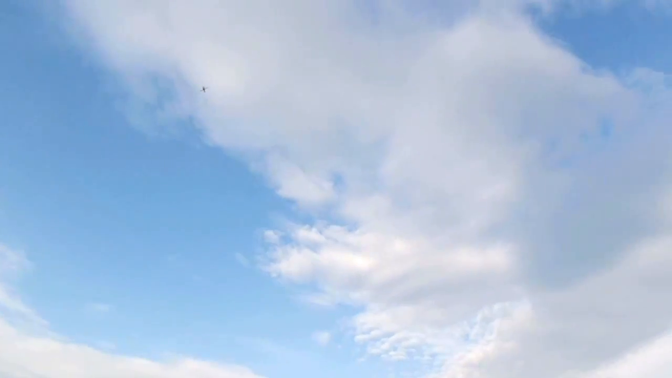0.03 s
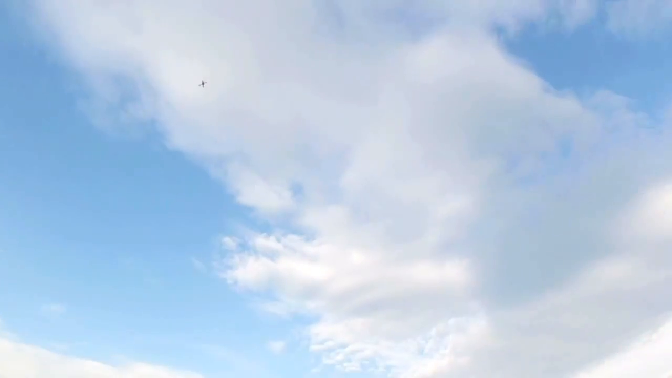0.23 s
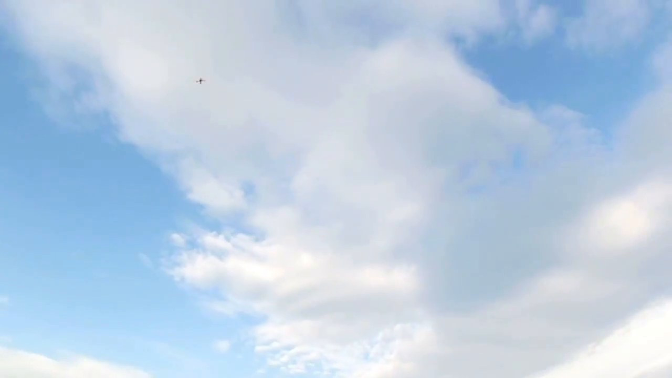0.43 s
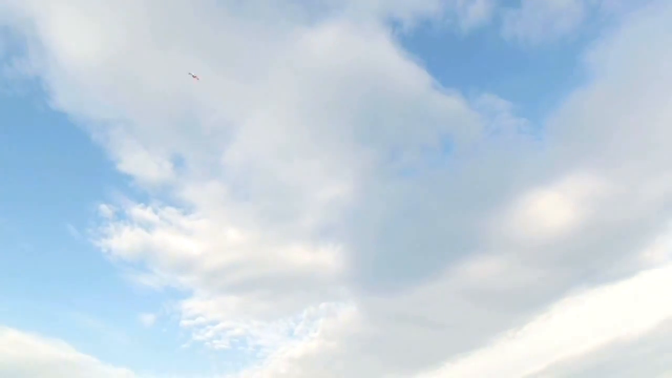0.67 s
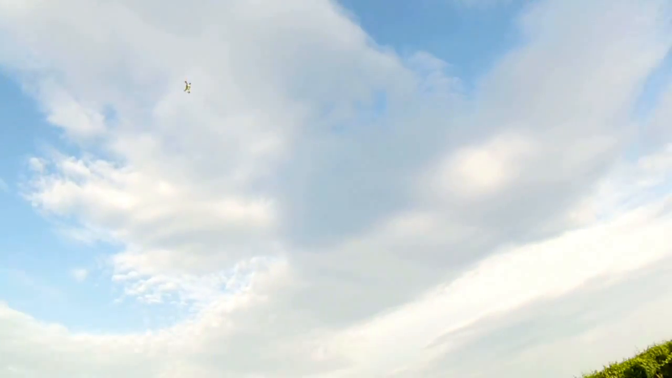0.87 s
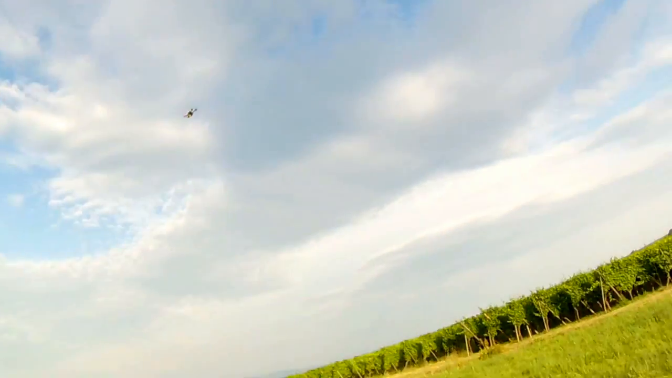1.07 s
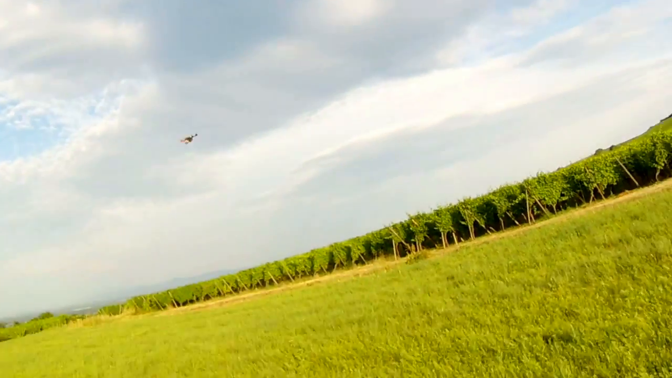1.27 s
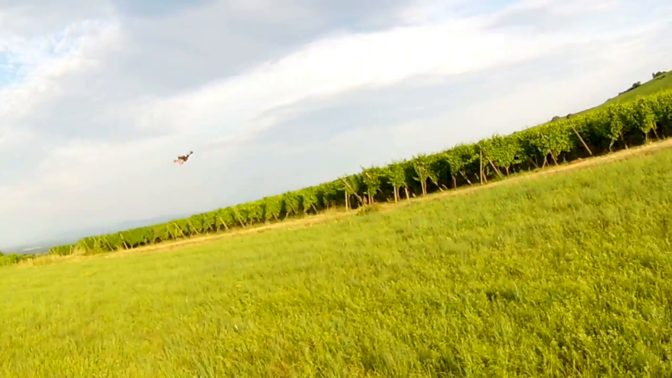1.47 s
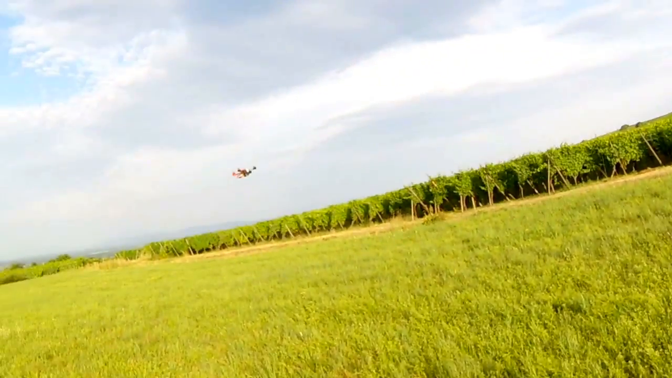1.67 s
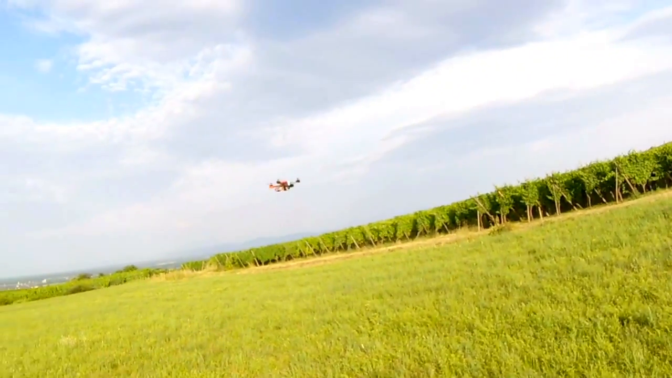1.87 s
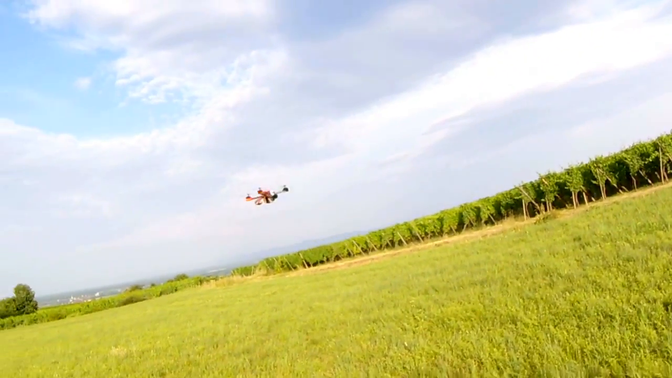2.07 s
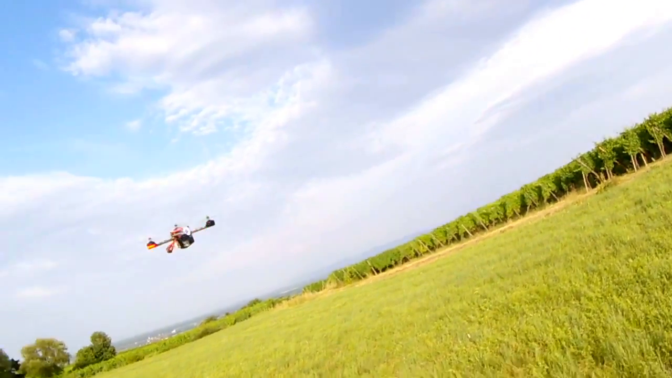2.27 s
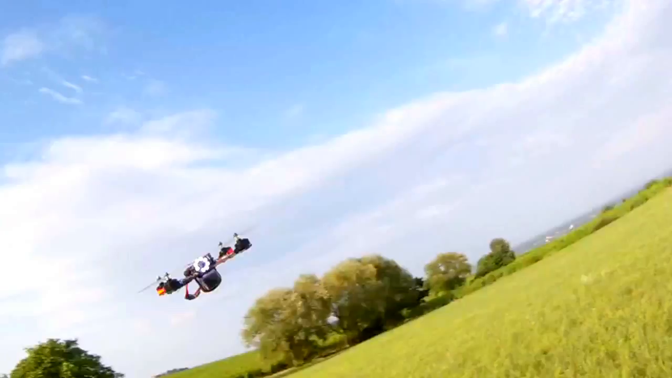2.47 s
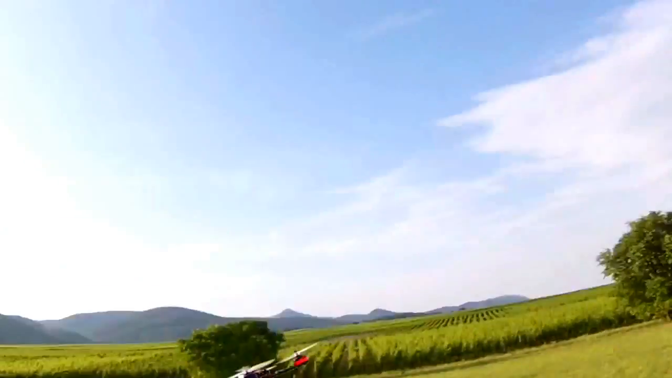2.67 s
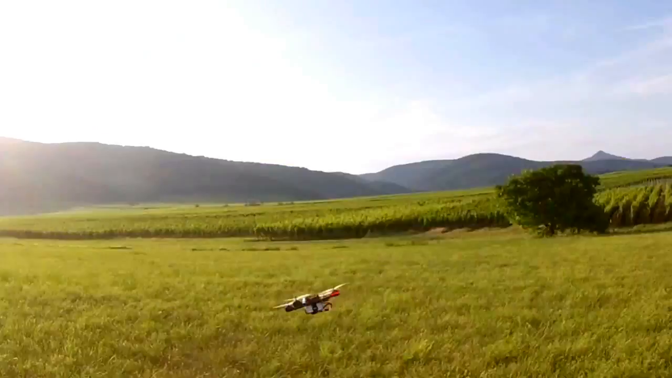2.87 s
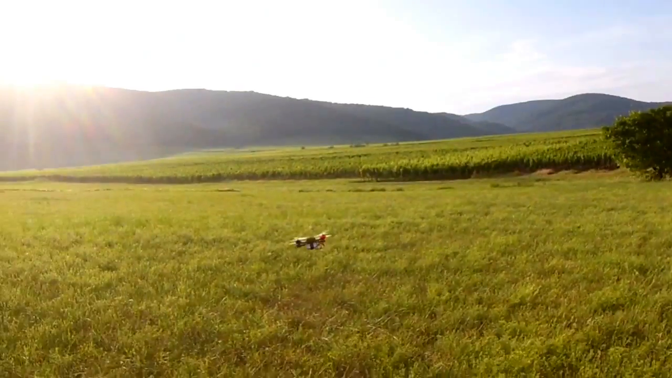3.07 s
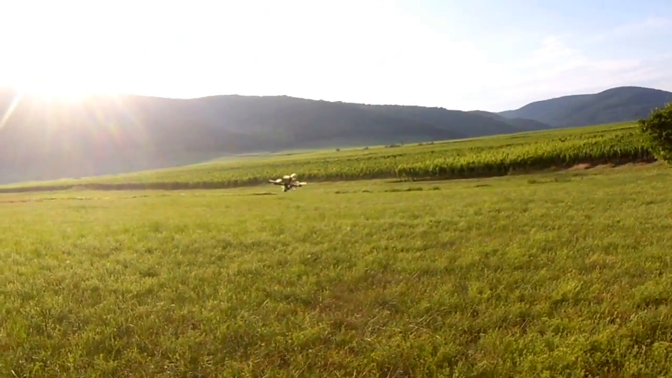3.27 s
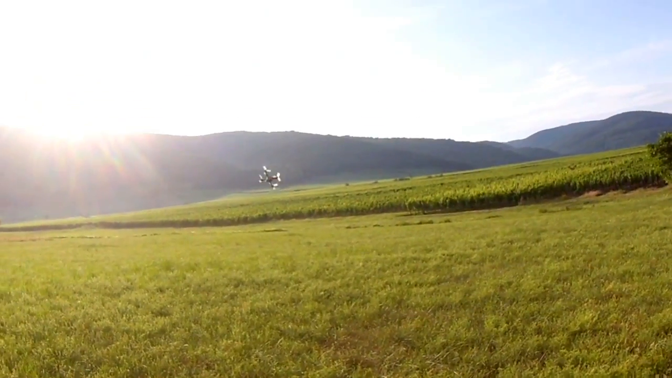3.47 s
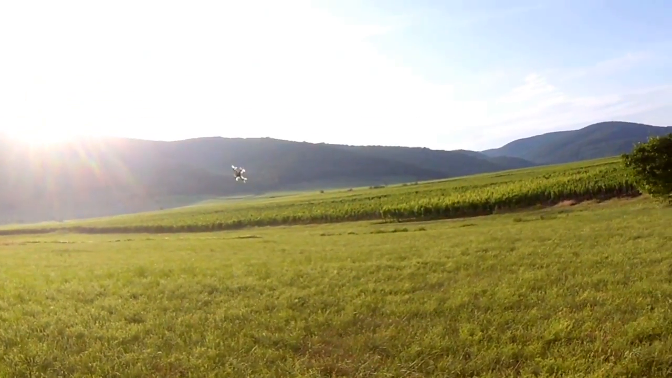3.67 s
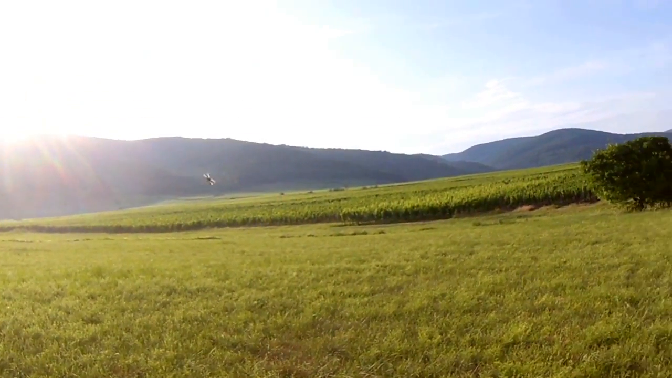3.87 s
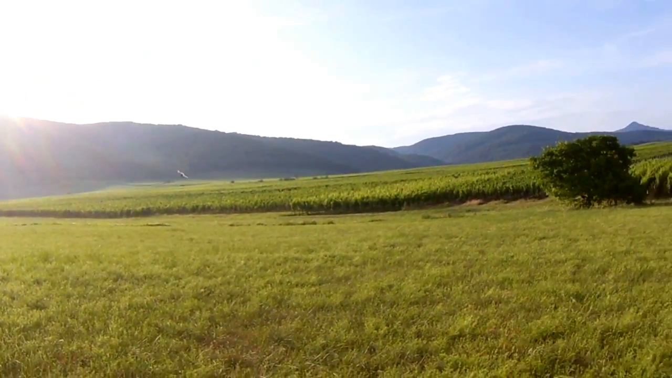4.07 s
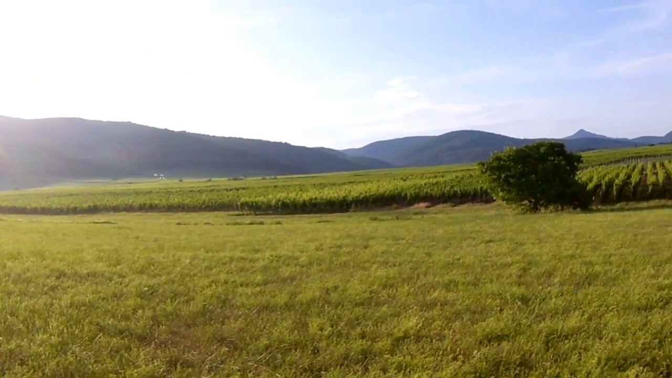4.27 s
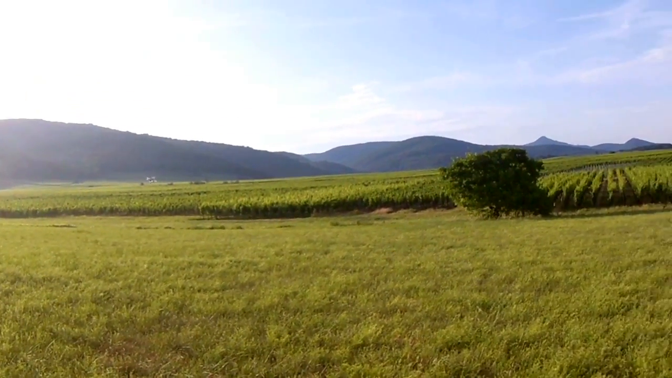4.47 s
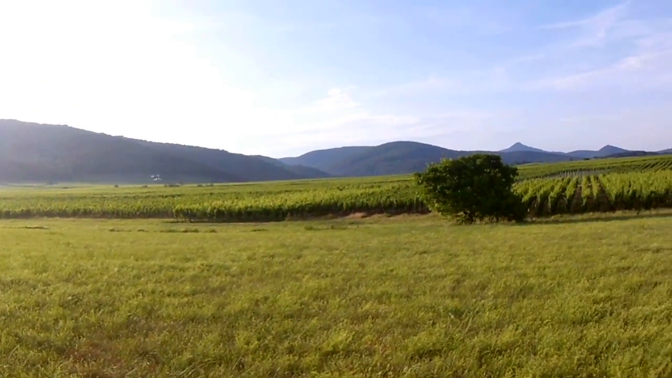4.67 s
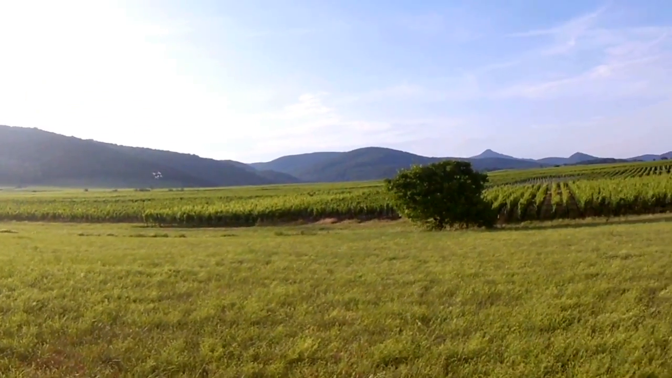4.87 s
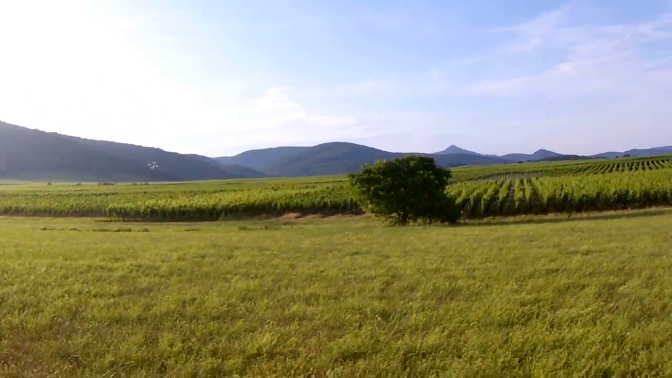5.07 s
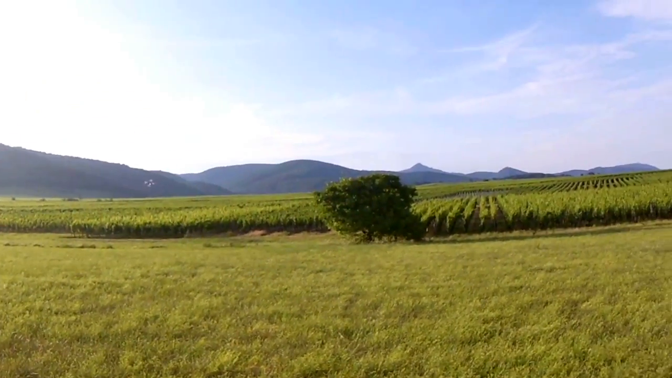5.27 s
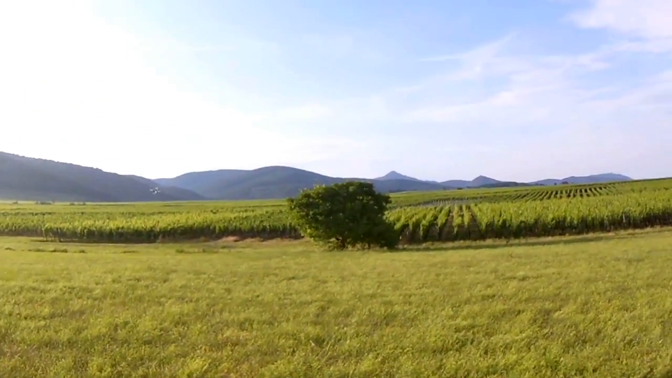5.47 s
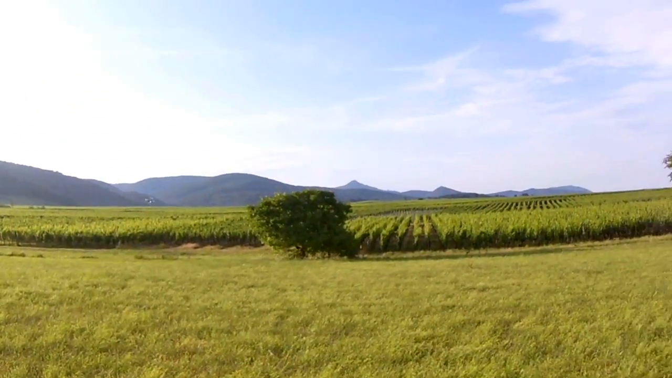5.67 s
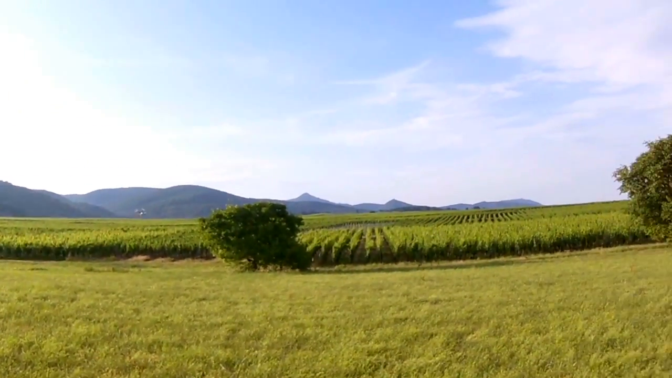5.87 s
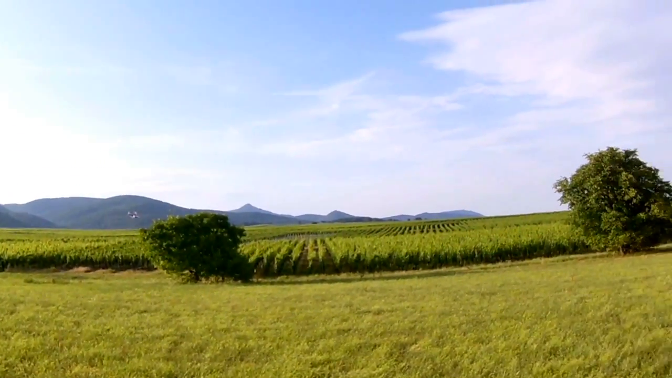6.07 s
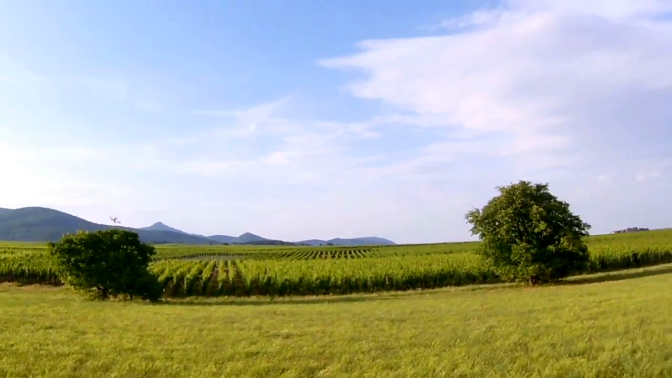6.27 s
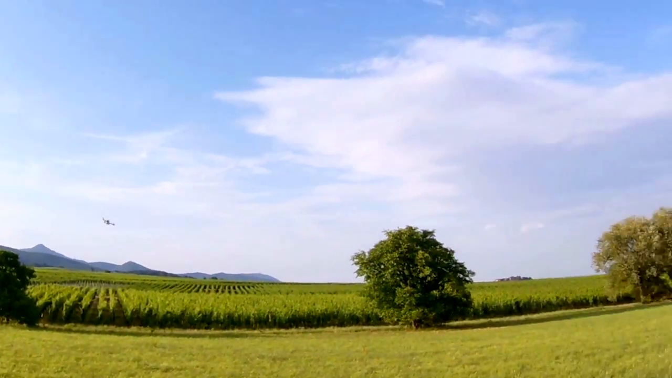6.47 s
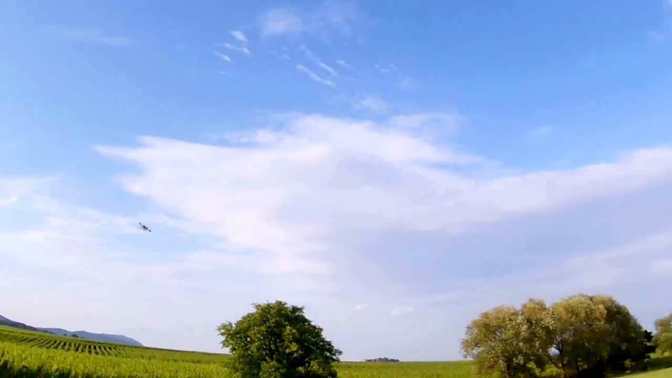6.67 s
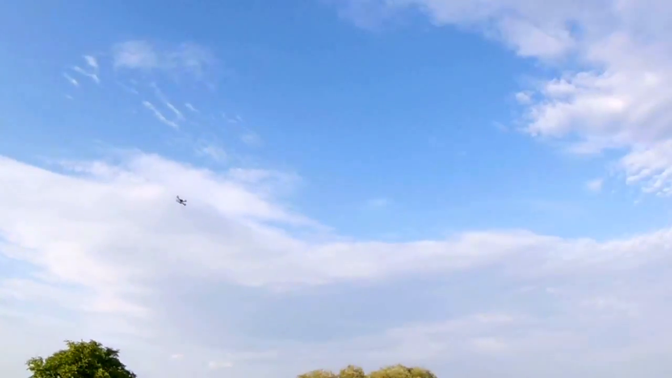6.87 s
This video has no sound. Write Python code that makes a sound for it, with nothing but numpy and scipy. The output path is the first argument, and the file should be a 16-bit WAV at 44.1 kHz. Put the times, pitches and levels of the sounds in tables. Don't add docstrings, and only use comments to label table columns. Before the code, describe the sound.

For the first second there is only a low, steady rush of air, slight electronic hiss and a very faint distant drone. From about 1.0 s a small quadcopter's rotors spool up fast, peaking around 1.3 to 1.6 s as a loud, raspy whine roughly doubled in pitch, with hissing chopped air. By 1.8 s it drops to a quieter, lower hum of several slightly detuned tones, with tiny snaps, growing steadily. Around 2.7 to 3.2 s a second rev and close pass swell, with a soft wind thump, then the pitch falls and a thin motor whine trails off by 3.5 s. It stays distant until a rough, fluttering surge at 4.4 to 5.3 s. A quieter buzz follows with low wind bumps near 5.7 to 6.3 s, then pitch climbs and level rises toward the end at about 7 s. The sound is dry, outdoor and slightly boxy.

```python
import sys
import numpy as np
from scipy import signal
from scipy.fft import rfft, irfft, next_fast_len
from scipy.io import wavfile
from scipy.ndimage import uniform_filter1d, map_coordinates

SR = 44100
rng = np.random.default_rng(int(sys.argv[2]) if len(sys.argv) > 2 else 0)


def volts_from_db(level):
    exponent = np.asarray(level, float) / 20
    return 10 ** exponent


def generate_wav(sig):
    pcm = np.round(np.clip(np.atleast_2d(sig).T, -1, 1) * 32767).astype(np.int16)
    wavfile.write(sys.argv[1], SR, pcm)


N = 304995
TIME_S = np.arange(N) / SR
CRUISE_HZ = 600
SLOW_SHAFT_DB = -28
MIDDLE_M = 15

# [start_s, turbulence_0_to_1]
TURBULENCE = [(0, .6), (1, .35), (1.3, .3), (1.55, .3), (1.7, .15), (2, .1), (2.9, .16), (3.03, .22),
              (3.1, .08), (3.3, .1), (3.45, .15), (3.7, .1), (3.9, .17), (4.2, .32), (4.9, .24), (5.2, .16),
              (5.75, .2), (5.85, .1), (6.5, .11), (6.92, .13)]
# [start_s, level_db]
STRENGTH = [(0, -70.5), (.98, -68.5), (1.25, -53), (1.33, -44.5), (1.54, -42), (1.63, -50.5), (1.77, -58.5),
            (2.69, -44.5), (3.1, -46), (3.51, -58.5), (4.18, -61.5), (4.49, -51), (4.8, -49.5),
            (4.9, -53.5), (5.32, -55), (5.51, -63.5), (6.34, -63), (6.9, -51)]
# [start_s, distance_m]
DISTANCE = [(0, 25), (1.4, 6.7), (2.2, 4), (3.05, 8.05), (3.33, 11), (3.5, 23), (4.7, 21), (5.25, 20),
            (5.8, 6.3), (6.4, 24.8), (6.92, 43)]

# [start_s, pitch_hz]
FAST_CRUISE = [(0, 620.6), (1, 649), (1.76, 501.6), (1.9, 499), (1.97, 572.5), (2.3, 572.8), (2.6, 551.5),
               (2.9, 551), (3.55, 588), (4.1, 543.3), (4.5, 650.3), (4.72, 649.7), (4.95, 505),
               (5.07, 488.2), (5.13, 587.7), (5.72, 622.4), (6.2, 720.4), (6.92, 760.7)]
# [start_s, spool_up_s, hold_s, spool_down_s,
# extra_hz]
FAST_PUNCHES = [(1.11, 0.32, .13, 0.18, 600), (1.385, .02, .01, .015, 60), (1.415, .015, .03, 0.03, -170),
                (1.6, .04, .03, .05, -50), (2.94, .04, .08, .05, -35), (3.27, .03, .02, .04, 30),
                (3.43, .03, .01, .03, 80), (4.82, .03, .04, .08, 25), (5.96, .05, .03, .12, 20),
                (6.02, .1, .1, .12, 27), (6.86, .04, .2, .1, 15), (3.52, .05, .25, 0.081, -30),
                (6.43, .04, 0.0099, .03, -25), (6.49, .03, .01, .05, 30), (2.89, .28, 0.061, .22, 415),
                (3.35, 0.02003, 0.01978, 0.0298, 71), (4.72, 0.056, .01, 0.065, 99.5),
                (5.73, .11, .09, 0.087, 135), (5.74, 0.098, .16, 0.18, 72), (6.27, .3, 0.59, .2, 335)]
# [start_s, blade_db, overtones_db]
FAST_AIM = [(0, -27, -19), (1.05, 0.5, 1), (1.42, -17, -10), (1.53, -13, -8), (1.68, 5.5, -8),
            (2.1, -4.5, -26), (2.3, 0.5, 2.5), (2.88, -1, -6.5), (2.95, -1, -5), (3.05, -2.5, 5.5),
            (3.11, 0.5, -12), (3.33, 0, 0.5), (3.5, 1, -9), (3.75, -8.5, -9), (4.3, -10.5, -4.5),
            (4.85, -2, -1), (5.9, -5, -3), (6.92, 0.5, -0.5)]
# [crest_s, beat_hz, depth_db, lasts_s,
# pitch_swing_hz]
BEATS_AND_HUNTING = [
    (1.534, 8.2, 4, 0.14, 13.5),
    (3.178, 10.6, 0.5, .14, 27.5),
    (4.502, 5.5, -0.5, .16, 29.5),
    (6.71, 8.8, 4, 0.23, -2.5),
                     (3.7, 11.5, 1.5, .25, 42),
]
# [middle_s, blade_db, overtones_db, lasts_s]
FAST_SWELLS = [(1.34, 0, 5, .04), (1.428, 0, -9, .012), (2.965, 0, 5, .02), (6.16, -10, 0, .07),
               (1.445, -8, 0, .005), (3.47, 5, 0, .03), (3.61, 0, 5, .04), (3.79, 0, 4, .04),
               (4.74, -6, 0, .04), (6.38, 0, 9, .05), (2.5, -9, 0.5, 0.027), (2.59, -4, 3.5, .03),
               (2.74, -9, -2, 0.024), (2.83, 4.5, -3, 0.06), (2.4, 2.5, -0.5, .06), (4.841, 0, 4.5, .025),
               (5.123, 0.5, 5, .025), (5.175, -3, -10, .02), (6.519, 4, 2, .02), (6.359, -3, 0, .015),
               (1.406, 5.5, -0.5, 0.014), (3.698, -1, 7, 0.14), (4.755, 4, 1.5, 0.045),
               (6.46, -4, -4, 0.026), (1.69, -8.5, -4, 0.036), (2.952, 3, 5.5, 0.023), (3.101, 0, -8, .02),
               (3.346, -0.5, -5, .02), (5.24, -2, 7.5, 0.044), (6.91, -7, -5, .015), (1.271, 8, 1, .008),
               (1.305, 6, 2, .015), (1.437, 9.5, -4, 0.011), (1.461, 9.5, 0.5, 0.0096),
               (3.411, 2.5, -7, .05), (4.798, -4.5, -0.5, 0.045), (6.576, -2.5, -10, 0.028),
               (6.809, 0.5, -5.5, 0.021), (1.285, -31, -7.5, 0.094), (2.987, -16.5, 1.5, 0.048),
               (3.189, 5, 0, 0.064), (3.36, -12, -5, 0.033), (4.874, 5, 3.5, 0.077),
               (5.042, -0.5, -2.5, 0.054), (5.351, -21, -5.5, 0.14), (6.31, 7.5, -15, 0.034),
               (6.428, -6, -18, 0.063)]
# [middle_s, third_db, fourth_db, shaft_db, lasts_s]
FAST_BALANCE = [(1.47, 0, -0.5, -6, 0.048), (2.15, 0.5, 0.5, 7, 0.23), (2.5, -9, 0.5, 1, 0.051),
                (2.63, 4, -1, 1, .07), (2.85, -2, 3, -9, .07), (3, -12, -1, -1, .09), (3.2, -7.5, 3, 0, .1),
                (3.04, -2, 5, 0, .05), (3.72, 0, 3, 0, .2), (4.5, 0, 5, 0, .15), (4.76, 0, -12, 0, .05),
                (4.7, 1, 1, -5, .15), (6.1, -6, -3, 1, .2), (6.75, 0, 0, -5.5, .04)]

# [start_s, pitch_hz]
SLOW_CRUISE = [(0, 479), (.9, 523.6), (1, 407), (1.2, 558.1), (1.78, 471), (1.9, 437.3), (1.96, 490),
               (2.9, 498.5), (3.5, 548), (4.2, 479.1), (4.6, 595.5), (4.85, 447), (5.05, 486.4), (5.3, 490),
               (5.4, 518), (5.72, 603.6), (6.1, 687), (6.92, 788.6)]
# [start_s, spool_up_s, hold_s, spool_down_s,
# extra_hz]
SLOW_PUNCHES = [(6.52, .03, .1, .08, -15), (6.75, .08, .3, .1, 20), (1.47, .04, .07, 0.0499, -60),
                (4.18, .01, .02, .06, -20), (5.13, .04, .01, .03, 25), (1.17, .22, .19, .14, 485),
                (2.97, 0.18, .08, .16, 260), (5.17, 0.054, 0.01, 0.0506, -45.5), (5.72, .11, .07, .17, 195),
                (6.36, 0.21, 0.61, .2, 163.5)]
# [start_s, blade_db, overtones_db]
SLOW_AIM = [(0, -17, -22), (.8, -3, -5), (.97, 21, 5), (1.15, 2, -9.5), (1.3, -5, 0), (1.6, -10, -7.5),
            (1.75, 8.5, -10.5), (2.3, 4, -7), (2.75, -4, -4.5), (3.05, -8, -27), (3.25, -9.5, -5),
            (3.5, -5, -15), (4.45, -2, -1), (4.85, -8.5, -20.5), (5.33, 2, 4), (5.48, -8.5, -11.5),
            (6.62, -0.5, -14.5), (6.92, -5.5, -2)]
# [middle_s, blade_db, overtones_db, shaft_db, lasts_s]
SLOW_SWELLS = [(1.21, -3, -8, 0, .03), (1.41, -10, -8, 0.5, .02), (1.432, 4, -5, 0, .008),
               (1.445, -8, -5, 0, .005), (1.457, 4, 0, -0.5, .008), (1.68, -5, 0, 0, .03),
               (1.49, -8, -3, 0, 0.018), (2.24, 2.5, 1, 0, 0.043), (2.37, 6, -1, 0, 0.061),
               (2.47, -10, 0, 0, .02), (2.55, 1.5, 2.5, 0, .05), (2.63, -8, -1, 0, .03),
               (2.87, -4, -4, 0, 0.051), (3.7, -3, -10, 0, .15), (4.25, 0, 5.5, 0, 0.039),
               (4.43, 3, -1, 0, 0.027), (4.99, -1, -4, 0, .03), (5.07, 0, 8, 0, .02),
               (5.13, -2, -8, 0, .03), (5.2, 5, 6, 0, .02), (6.5, 0, 7, 0, .07), (6.65, 0, 0, 6.5, .12)]
# [start_s, spool_up_s, hold_s, spool_down_s, extra_hz]
LAGGING_PUNCH = [
    (1.12, .38, .06, 0.11, 344.4),
]

# [start_s, pitch_hz, blade_db, overtones_db]
CORRECTIONS = [
    [(1.01, 360.2, 10, -4), (1.12, 399.5, 9, 7), (1.17, 440, 4, 0), (1.21, 456, 3, -4)],
    [(1.24, 700, -19, -9), (1.33, 820.7, -22, -3), (1.43, 1000, -15.5, -2), (1.5, 1290, -25, -3),
     (1.56, 1130, -21, -10), (1.64, 800, -14, -12)],
    [(3.08, 600, -12, -2), (3.2, 650.2, -26, -16), (3.32, 622.7, -9, -4.5), (3.42, 603, -4, -6),
     (3.48, 515, -4, -6), (3.6, 495.2, -8, -10), (3.75, 518, -15, -17), (4.1, 497.5, -4, -17)],
    [(4.28, 554.9, 3, 3), (4.5, 563.2, -5.5, -7), (4.6, 572.3, -11, 1.5), (4.66, 601.8, -11, 1),
     (4.76, 637, -17, -5), (4.84, 597, -3, 0), (4.9, 572.6, -3, -0.5), (5, 590.7, -11.5, -12),
     (5.08, 597.6, -11, -10)],
    [(5.17, 490, 4, -2), (5.24, 505, 0, 2), (5.3, 535, 3, 6), (5.38, 570, -8, 7), (5.43, 570, -4, -10)],
    [(6.11, 615, -15, -4), (6.31, 625, -12, 0), (6.37, 590, -12, -12), (6.47, 640, -6, -8),
     (6.53, 695, -14, -6), (6.75, 708.5, -10.5, -9), (6.86, 722, -20, 4.5), (6.96, 733, -17, -3)],
]
# [third_db, fourth_db]
CORRECTING_UPPER = [(4, -6), (-2, -4), (0, 9), (4, -3), (10, -6), (-6, -14)]

# [shaft_multiple, level_db relative to the shaft tone]
UNEQUAL_BLADES = [(2, -3), (4, -5.5), (5, -14)]
# [pitch_hz, level_db]
HOUSING = [(190, -9.5), (330, 0.5), (600, -1.5), (680, -7), (735, 0.5), (1300, 4), (1450, 1.5),
           (1900, -6.5), (2550, -1), (3000, -9.5), (4100, -8), (4400, -19.5), (5050, -10), (5800, -42.5)]
# [start_s, pitch_hz, level_db]
WHINE = [(3.09, 3500, -95), (3.14, 3800, -80), (3.22, 4150, -76), (3.3, 4100, -77), (3.38, 3960, -75),
         (3.42, 3900, -100)]

# [pitch_hz, level_db per Hz]
CHOP = [(88, -47.5), (150, -32.5), (436, -10.5), (478, -8.5), (553, -8), (810, -6), (1130, 2.5),
        (1270, 1.5), (2240, -9), (3500, -43), (4550, -74), (7700, -120)]
# [pitch_hz, level_db per Hz]
EDGE = [(1900, -22), (2500, -0.5), (2750, -4.5), (2950, -10), (3500, -14.5), (3800, -13), (4150, -13.5),
        (4500, -17.5), (5020, -17.5), (5250, -29.5), (5700, -35), (7000, -30.5), (9500, -40), (12000, -65)]
# [start_s, peak_db, pitch_hz, crack_db]
SNAPS = [(1.856, -38, 940, -45), (2.156, -35, 1170, -39), (2.477, -39, 1117, -14),
         (2.697, -37.5, 1649, -42), (2.9358, -26.5, 1165, -45.5), (4.642, -34, 1280, -31)]
# [start_s, peak_db, pitch_hz]
KNOCKS = [(6.1, -50, 301), (6.179, -47.5, 321.5), (6.3, -48.5, 256)]
# [pitch_hz, level_db per Hz]
HOUSING_RING = [(4400, -60), (4720, -4), (4850, -13.5), (5030, -1.5), (5250, -60)]
# [middle_s, level_db, lasts_s]
RINGS = [(4.58, -81, 0.35), (5.899, -86, .2), (6.7, -88.5, .3)]
# [middle_s, rise_db, lasts_s]
GUSTS = [(2.75, 16, 0.13), (5.75, 12, .45), (6.2, 16.6, 0.15)]
# [pitch_hz, level_db per Hz]
THUMP = [(15, -54), (40, -9.5), (80, -3.5), (150, 4), (250, -4.5), (450, -42)]
# [pitch_hz, level_db per Hz]
AIR = [(15, -68), (25, -41.5), (134, -13.5), (222, -5.5), (331, -2.5), (569, -4), (642, -2), (724, -7.5),
       (3000, -31), (3900, -60), (6600, -120)]
# [pitch_hz, level_db per Hz]
PREAMP = [(1760, -25.5), (3000, 0), (4180, -5), (5620, -3), (10100, -7.5), (14600, -9), (15600, -11)]
# pitch_hz, width_hz, depth_0_to_1
CAVITY = (707.4, 39, 0.85)


def unit(x):
    return x / np.sqrt(np.mean(x ** 2) + 1e-20)


def curves(rows):
    s, *columns = np.transpose(rows)
    return [np.interp(TIME_S, s, column) for column in columns]


def wobble(rate):
    points = rng.standard_normal(int(N * rate / SR) + 4)
    return unit(map_coordinates(points, [np.arange(N) * rate / SR]))


def filtered(x, response):
    m = next_fast_len(N + 8192)
    return irfft(rfft(x, m) * response(np.fft.rfftfreq(m, 1 / SR)), m)[..., :N]


def coloured(x, spectrum):
    f, db = np.transpose(spectrum)
    return unit(filtered(x, lambda hz: volts_from_db(np.interp(np.log(hz + 1), np.log(f + 1), db))))


def noise(spectrum):
    return coloured(rng.standard_normal(N), spectrum)


def bell(s, lasts):
    return np.exp(-((TIME_S - s) / lasts) ** 2)


def swells(rows):
    return sum(np.outer(db, bell(s, lasts)) for s, *db, lasts in rows)


def ease(s, length):
    return np.sin(np.pi / 2 * np.clip((TIME_S - s) / length, 0, 1)) ** 2


def spooled(punches):
    return sum(hz * (ease(s, up) - ease(s + up + hold, down)) for s, up, hold, down, hz in punches)


def rotor(hz, levels, turbulence):
    hunting = 0.06 * wobble(20) + 0.03 * wobble(120)
    shaft_hz = uniform_filter1d(hz, size=900) / 3 * (1 + turbulence * hunting)
    turn = 2 * np.pi * np.cumsum(shaft_hz) / SR
    sound = np.zeros(N)
    for k, db in levels:
        shaken = np.minimum(0.85 * turbulence * (k / 3) ** 0.7, 0.85)
        load = ((1 - shaken) + shaken * wobble(90)) / np.hypot(1 - shaken, shaken)
        strength = np.sqrt(2) * volts_from_db(db + 1.29 * wobble(15)) * load
        sound += strength * np.sin(k * turn + rng.uniform(0, 7.03))
    return sound, 3 * turn


def twins(hz, blade_db, second_db, third_db, shaft_db, turbulence, fourth_db=0):
    passed = lambda k: np.interp(k * hz / 3, *np.transpose(HOUSING))
    levels = [(1, shaft_db), (3, blade_db), (6, second_db), (9, third_db)]
    levels += [(k, shaft_db - passed(1) + passed(k) + db) for k, db in UNEQUAL_BLADES]
    fourth_db = fourth_db - 12.5 - 12 * np.log2(hz / CRUISE_HZ)
    levels.append((12, second_db + passed(12) + fourth_db))
    levels.append((14, second_db + passed(14) - 22.5))
    first, passes = rotor(hz, levels, turbulence)
    second, _ = rotor(hz * (1 + 0.16 * turbulence * wobble(7)), levels[1:4], turbulence)
    share = 1.7 * turbulence
    return (first + share * second) / np.hypot(1, share), passes


def tones(hz, blade_db, overtone_db, shaft_db, third_db=0):
    strength_db, = curves(STRENGTH)
    distance_m, = curves(DISTANCE)
    octaves = np.log2(hz / CRUISE_HZ)
    blade = strength_db + blade_db + 22.5 * octaves
    second = strength_db + overtone_db
    third = strength_db + np.minimum(overtone_db, -5) - 13 - 6.5 * octaves
    third = third + third_db - 0.46 * (distance_m - MIDDLE_M)
    return hz, blade, second, third, blade + shaft_db


def fastest(turbulence):
    aimed_db, overtone_db = curves(FAST_AIM)
    blade_db = aimed_db
    hz = curves(FAST_CRUISE)[0] + spooled(FAST_PUNCHES)
    for s, beat_hz, db, lasts, swing_hz in BEATS_AND_HUNTING:
        beat = bell(s, lasts) * np.cos(2 * np.pi * beat_hz * (TIME_S - s))
        hz = hz + swing_hz * beat
        blade_db = blade_db + db * beat
        overtone_db = overtone_db + db * beat
    swell_blade_db, swell_overtone_db = swells(FAST_SWELLS)
    blade_db, overtone_db = blade_db + swell_blade_db, overtone_db + swell_overtone_db
    third_db, fourth_db, shaft_db = swells(FAST_BALANCE)
    shaft_db = shaft_db - 19.5 + 0.7 * (aimed_db - blade_db)
    return twins(*tones(hz, blade_db, overtone_db, shaft_db, 5 + third_db), turbulence, fourth_db)


def slower(turbulence):
    blade_db, overtone_db = curves(SLOW_AIM)
    swell_blade_db, swell_overtone_db, swell_shaft_db = swells(SLOW_SWELLS)
    hz = curves(SLOW_CRUISE)[0] + spooled(SLOW_PUNCHES)
    levels = tones(hz, blade_db + swell_blade_db, overtone_db + swell_overtone_db,
                   SLOW_SHAFT_DB + swell_shaft_db, third_db=-2)
    return twins(*levels, turbulence)


def lagging(turbulence):
    extra_hz = spooled(LAGGING_PUNCH)
    levels = tones(490 + extra_hz, -11.5, -7.5, SLOW_SHAFT_DB)
    return twins(*levels, turbulence)[0] * np.sqrt(np.abs(extra_hz) / extra_hz.max())


def correcting(turbulence):
    fade_s = 0.029
    fades = []
    for rows in CORRECTIONS:
        inside_s = np.minimum(TIME_S - rows[0][0], rows[-1][0] - TIME_S)
        fades.append(np.clip(inside_s / fade_s, 0, 1))
    fades = np.array(fades)
    third_db, fourth_db = np.transpose(CORRECTING_UPPER) @ (fades > 0)
    levels = tones(*curves(np.concatenate(CORRECTIONS)), SLOW_SHAFT_DB, third_db)
    return fades.sum(axis=0) * twins(*levels, turbulence + 0.04, fourth_db)[0]


def whine():
    hz, level_db = curves(WHINE)
    return rotor(hz, [(3, level_db)], 0.2)[0]


def blade_noise(passes):
    strength_db, = curves(STRENGTH)
    distance_m, = curves(DISTANCE)
    edge_db = -66.9 + 1.01 * (strength_db + 50) - 0.29 * (distance_m - MIDDLE_M)
    gate = 1 + 0.33 * sum(np.sin(p) for p in passes)
    gusty = lambda: gate * volts_from_db(1.3 * wobble(40) + 0.8 * wobble(200)) * rng.standard_normal(N)
    return volts_from_db(strength_db - 1.5) * coloured(gusty(), CHOP) + volts_from_db(edge_db) * coloured(gusty(), EDGE)


def swing(events, t60):
    out, t = np.zeros(N + SR), np.arange(3000) / SR
    for s, db, hz, *crack_db in events:
        body = np.sin(2 * np.pi * hz * t) * (1 - np.exp(-t * hz * 7.1))
        jolt = volts_from_db(-60 * t / t60) * body
        for level_db in crack_db:
            bright_noise = np.diff(rng.standard_normal(len(t) + 1))
            jolt = jolt + volts_from_db(level_db + 19.5 - 60 * t / 0.0071) * bright_noise
        out[round((s + 0.0012) * SR):][:len(t)] += volts_from_db(db + 5) * jolt
    return filtered(out[:N], lambda f: 1 / (1 + (f / 4600) ** 8))


def ringing():
    swell = sum(volts_from_db(db) * bell(s, lasts) for s, db, lasts in RINGS)
    return swell * noise(HOUSING_RING)


def wind():
    level_db = -87 + sum(db * bell(s, lasts) for s, db, lasts in GUSTS)
    return volts_from_db(level_db) * coloured(volts_from_db(3.0 * wobble(25)) * rng.standard_normal(N), THUMP)


def steady_air():
    return volts_from_db(-61.5) * noise(AIR)


def preamp_hiss():
    return volts_from_db(-78) * noise(PREAMP)


def scene():
    turbulence, = curves(TURBULENCE)
    fast, fast_pass = fastest(turbulence)
    slow, slow_pass = slower(turbulence)
    sound = fast + slow + lagging(turbulence) + correcting(turbulence)
    sound += blade_noise([fast_pass, slow_pass])
    sound += swing(SNAPS, t60=0.0044) + swing(KNOCKS, t60=0.03)
    thin = filtered(sound, lambda f: (1j * f / (120 + 1j * f)) ** 2)
    return (thin + whine() + ringing() + wind() + steady_air() + preamp_hiss())[None]


def low_pass(x):
    return signal.sosfilt(signal.butter(12, 15150, fs=SR, output="sos"), x)


def record(dry):
    hz, width, depth = CAVITY
    cavity = lambda f: 1 - depth * 1j * f * width / (hz * hz - f * f + 1j * f * width)
    return low_pass(filtered(dry, cavity))


dry = scene()
out = record(dry)
generate_wav(out)
```